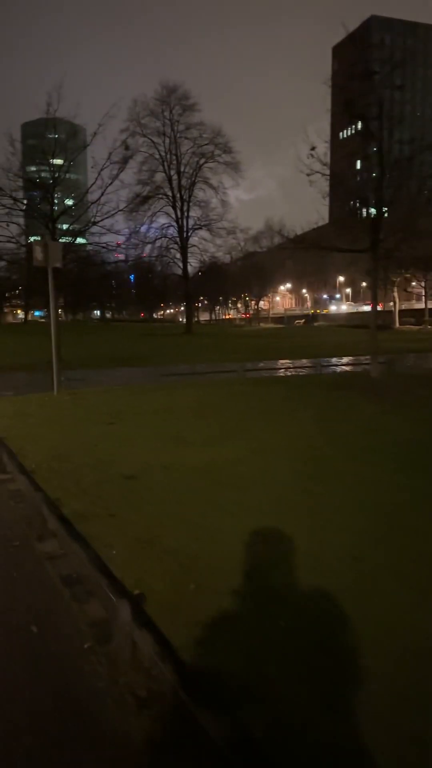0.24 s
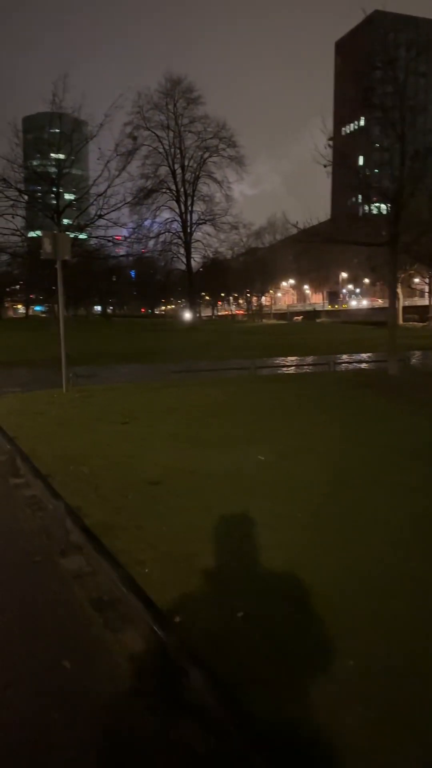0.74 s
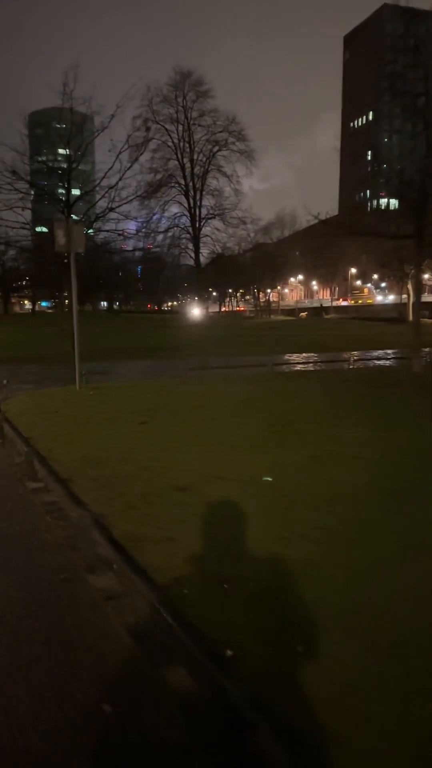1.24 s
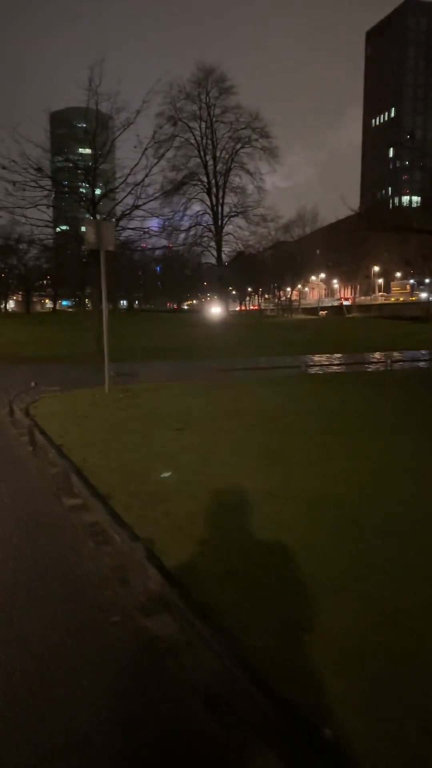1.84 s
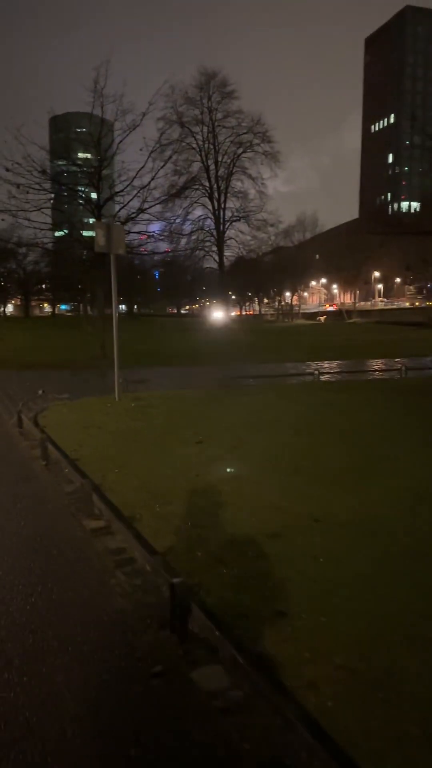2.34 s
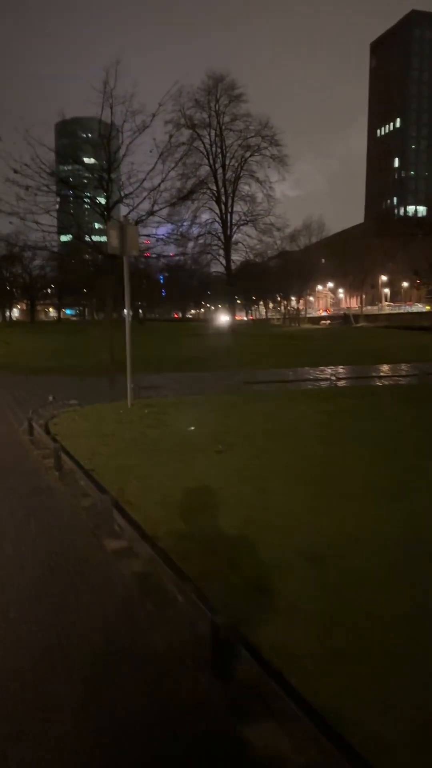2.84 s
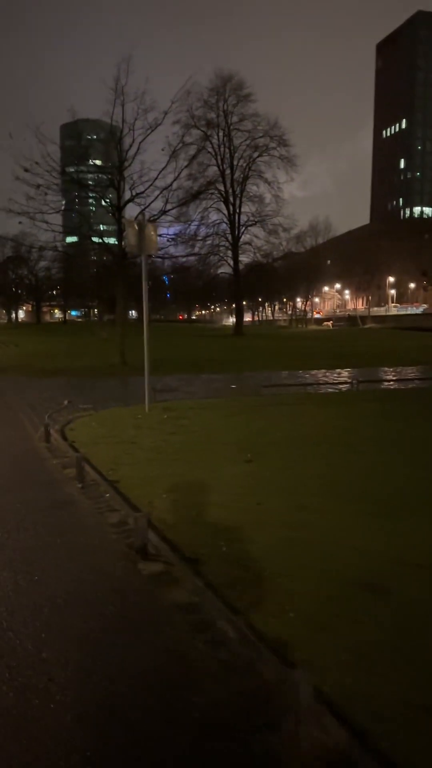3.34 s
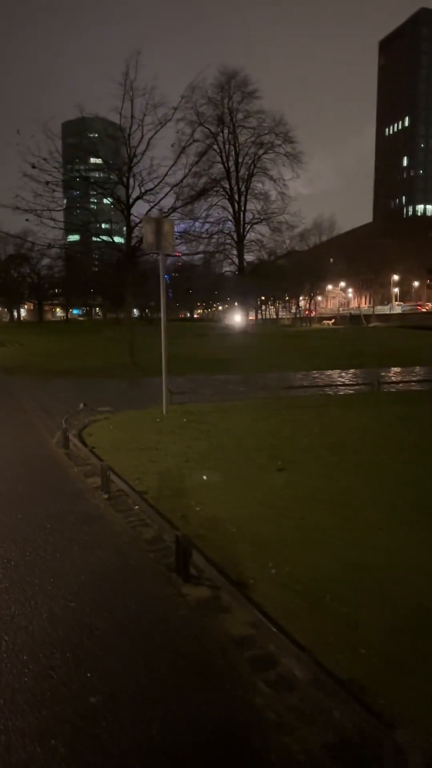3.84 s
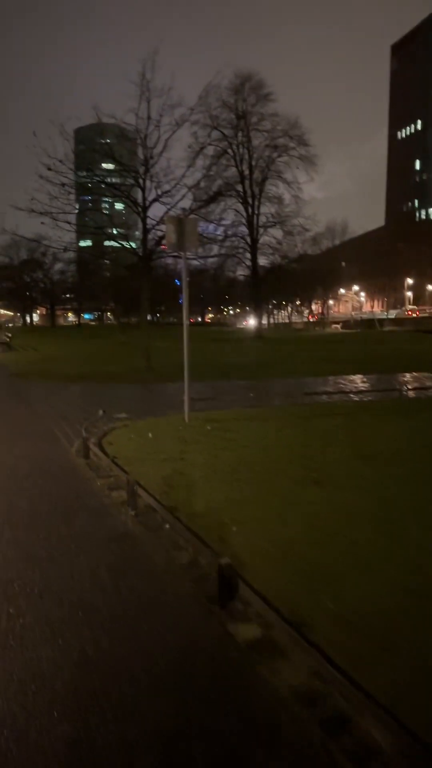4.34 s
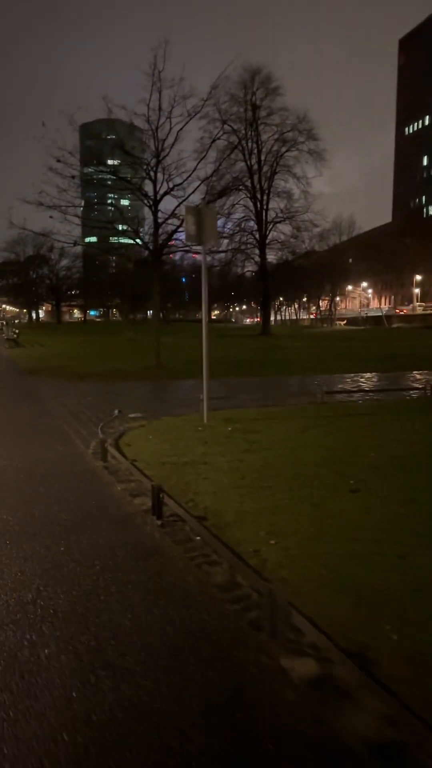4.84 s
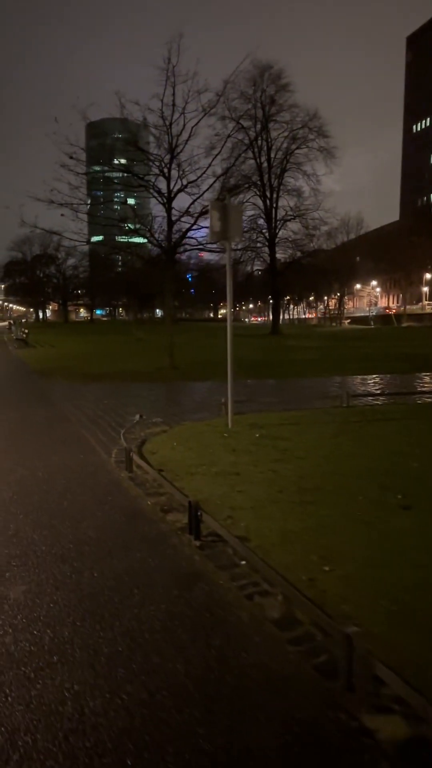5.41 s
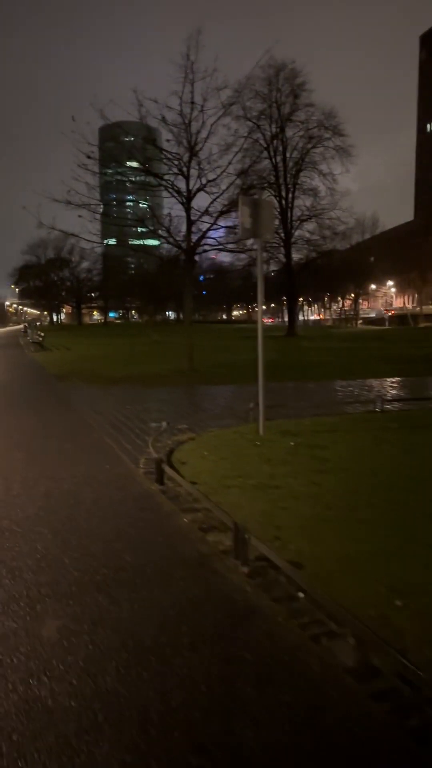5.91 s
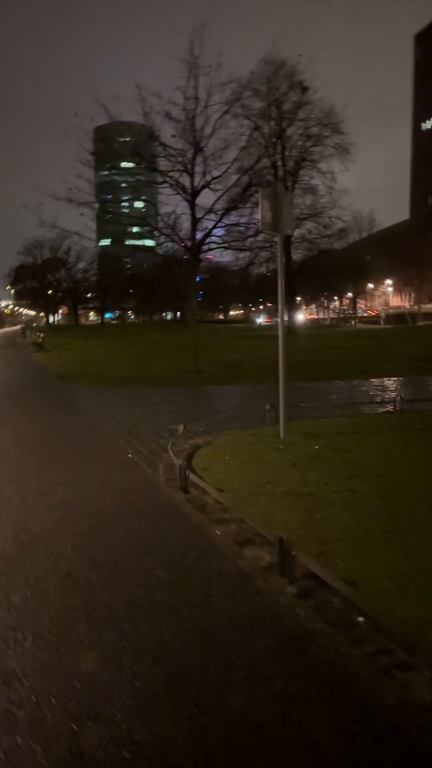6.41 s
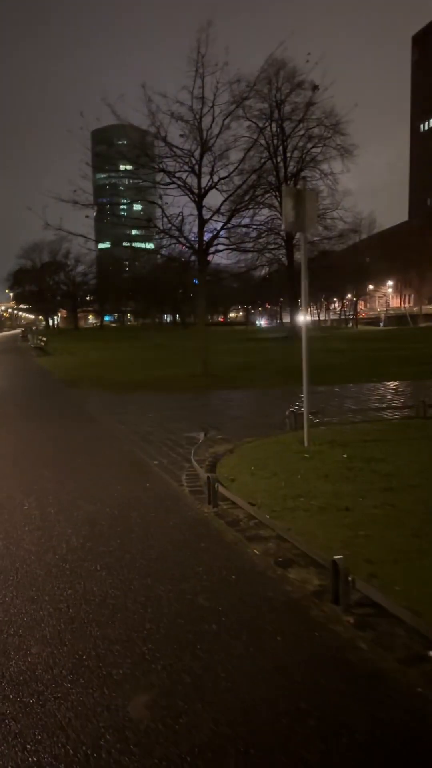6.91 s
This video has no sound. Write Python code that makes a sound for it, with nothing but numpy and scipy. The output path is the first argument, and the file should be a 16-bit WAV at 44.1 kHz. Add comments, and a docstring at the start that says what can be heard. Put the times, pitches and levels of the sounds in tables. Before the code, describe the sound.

A wide stereo outdoor scene, about seven seconds, on a wet path beside a lawn with city traffic beyond. From the start, distant engines make a low, wavering, throbbing drone with a fainter boom an octave above and deep rumble swelling at about 0.5, 0.9 and 2 seconds. Close footsteps fall roughly twice a second, each a short scuff with sharp tiny cracks and ticks of grit; the crispest come near 1.6 and 2.1 seconds. They soften after 3 and nearly vanish after 4, with only stray faint ticks around 5 and 5.6. The drone sinks near 3.5, then pulls again at a slightly lower pitch; a soft wash and brief faint whine of a passing vehicle peak around 3.6 to 4.2. Steady tyre rush, mostly left, with thin wet hiss continues; the watery swish thins late. Rumble returns around 6.5.

```python
"""A wet park path at night, walked beside a lawn with city traffic beyond it.
Close by, soles scuff and crack grit about twice a second, fading after four seconds: grains snap, ring and knock.
Far engines drone as beating clusters of tones, boom and rumble, ease off around 3.5 s and pull again.
Tyres rush on the wet road, more to the left, as shaped noise with hiss and swish; one vehicle whines past."""
import sys
import numpy as np
from scipy import signal
from scipy.fft import rfft, irfft
from scipy.io import wavfile
from scipy.ndimage import uniform_filter1d

SR = 44100
rng = np.random.default_rng(int(sys.argv[2]) if len(sys.argv) > 2 else 0)


def dump_mix(stems):
    """Bounce the given channels to the path in sys.argv[1] as a 16-bit WAV at rate SR."""
    frames = np.atleast_2d(stems).T  # one column per channel
    limited = np.clip(frames, -1, 1)  # hard clip at full scale
    pcm = np.round(limited * 32767).astype(np.int16)
    wavfile.write(sys.argv[1], SR, pcm)


N = 315832
TIME = np.arange(N) / SR
FREQS = np.maximum(np.fft.rfftfreq(N, 1 / SR), 1)

# Levels are in dB; some of the functions add a gain of their own.

# larger grains cracking under a sole: start_s, ring_hz, ring_db, snap_db, knock_hz, knock_db
GRAIN_CRACKS = [(.1612, 6240, -43, -28, 2500, -53), (0.169, 5420, -38, -21, 3100, -28.5),
                (.3618, 8060, -29, -23, 2600, -34), (0.3772, 6030, -43, -26, 1700, -45),
                (.3867, 6290, -46, -27, 2800, -50), (0.571, 7900, -43, -27, 2100, -54.5),
                (0.7546, 6640, -43, -32, 1800, -46), (.7918, 6900, -48, -34, 1700, -42),
                (0.8047, 4800, -26, -30, 3300, -31.5), (.8285, 3970, -34, -19, 2780, -24),
                (1.2067, 8400, -44, -27, 1800, -49), (1.2108, 8780, -41, -32, 1800, -55),
                (1.2624, 6130, -36, -25, 2700, -30), (1.3036, 7100, -44, -24, 2450, -39),
                (1.3176, 6160, -44, -28, 1750, -45), (1.6336, 5300, -22, -7, 2000, -25),
                (1.6449, 7060, -30, -22, 2000, -45), (1.649, 6290, -30, -19, 1900, -29),
                (1.652, 5990, -33, -15, 2450, -33), (1.6593, 9600, -33, -16, 2840, -36),
                (1.6815, 6200, -42, -30, 2150, -45), (1.6918, 7260, -42, -27, 1700, -41),
                (1.6967, 6240, -37, -26, 1700, -44), (1.7011, 7200, -32, -18.5, 2670, -31),
                (2.1028, 8960, -39, -28, 1800, -47), (2.106, 8180, -30, -20, 1800, -30),
                (2.1108, 7360, -42, -18, 1900, -44), (2.1664, 9220, -31, -22, 2760, -27),
                (2.1684, 8200, -34, -25, 1900, -28), (2.1774, 8550, -27, -14, 1900, -23),
                (2.179, 5320, -30, -21, 2800, -34), (2.2884, 7500, -46, -30, 1700, -50),
                (2.5668, 7660, -43, -23, 2200, -40), (2.579, 6290, -42, -24, 1700, -44),
                (2.6223, 9220, -33, -15, 2370, -35), (2.631, 8010, -35, -18.5, 2840, -44),
                (2.763, 7620, -45, -21, 2800, -47), (2.9359, 8550, -47, -29, 2750, -52),
                (3.0357, 8530, -45, -29, 1700, -48), (3.0596, 8250, -39, -24, 2710, -40),
                (3.1016, 6030, -45, -28, 2370, -37), (3.1247, 7200, -34.5, -21, 3790, -28.5),
                (3.1353, 8310, -40, -29, 2840, -38), (3.5581, 4260, -30, -32, 2630, -35),
                (3.5765, 5860, -49, -34, 1700, -37), (3.582, 7620, -49, -26, 1850, -43),
                (3.5894, 7800, -49, -32, 2400, -47), (3.6144, 5340, -41, -27, 2580, -47),
                (4.0055, 4600, -38, -30, 1700, -46), (4.0125, 4700, -40, -31, 3500, -45),
                (5.0671, 7950, -48, -33, 1800, -50), (5.1693, 7200, -54, -32, 2400, -52),
                (5.626, 6800, -49.5, -39, 2400, -56)]
# broad spectrum of the snap of a breaking grain: frequency_hz, density_db (per Hz)
SNAP_SPECTRUM = [(900, -30), (1900, -7), (2800, -7), (4100, -8), (5300, -0.5), (7000, -0.5), (8700, .5),
                 (10000, -2.5), (12000, -22.5), (14500, -12), (17000, -19.5)]
# spectrum of the dull spray as a grain knocks: frequency_hz, density_db (per Hz)
KNOCK_SPECTRUM = [(500, -25), (1100, -4), (1750, 1.5), (2700, 4), (3700, -6), (4600, -3), (6000, -34.5)]


def grit(splinter_db=-11.0, splinter_s=0.0017, ring_t60_s=0.0054, knock_t60_s=0.0058,
         bright_db=-5.0, spray_db=8.5, spray_s=0.0012, alike=0.31):
    """Impulsive fracture: a grain snaps, rings high and splinters, and knocks on the paving with a dull spray."""
    snaps, rings, spray = np.zeros((3, 2, N))
    age = TIME[:SR // 50]
    for start_s, ring_hz, ring_db, snap_db, knock_hz, knock_db in GRAIN_CRACKS:
        splinters = from_db(splinter_db) * pair(*rng.standard_normal((2, len(age))), alike)
        burst = splinters * np.exp(-age / splinter_s)
        burst[:, 0] = 1   # the snap itself is a single impulse
        start = np.clip(int(start_s * SR), 0, N - len(age))
        span = slice(start, start + len(age))
        snaps[:, span] += from_db(snap_db + bright_db) * burst
        modes = (ring_hz, ring_db, ring_t60_s), (knock_hz, knock_db, knock_t60_s)
        for hz, level_db, t60_s in modes:
            decay = from_db(level_db - 60 * age / t60_s)
            rings[:, span] += decay * np.sin(2 * np.pi * hz * age)
        spray[:, span] += from_db(knock_db + spray_db) * splinters * np.exp(-age / spray_s)
    return colour(snaps, SNAP_SPECTRUM) + rings + colour(spray, KNOCK_SPECTRUM)


# bright part of a crunch: frequency_hz, density_db (per Hz)
BRIGHT_SPECTRUM = [(2500, -29.5), (4400, -16.5), (5200, -4.5), (7000, -0.5), (8700, 1.5), (10000, -3.5),
                   (12000, -21), (14000, -9), (15500, -12.5), (17000, -19)]
# dull part of a crunch: frequency_hz, density_db (per Hz)
DULL_SPECTRUM = [(1500, -25), (2700, -1.5), (3400, 0), (4600, -0.5), (5400, -13), (8000, -43)]


def crunch(bright, dull, soft_hz=11000):
    """Contact filtering: soft contacts excite the bright and dull colours of the grit, without its very top."""
    top_cut = signal.butter(2, soft_hz, fs=SR, output="sos")
    return signal.sosfilt(top_cut, colour(bright, BRIGHT_SPECTRUM) + colour(dull, DULL_SPECTRUM))


# footsteps, a heel touching down and then the sole rolling:
# heel_peak_s, heel_db, heel_spread_s, sole_db, sole_dull_db (added to the sole's dull part)
FOOTSTEPS = [(0.29, -63, .006, -61, 0), (0.754, -57.5, 0.0075, -67, 7), (1.214, -62, 0.012, -62.5, 2),
             (1.641, -41.5, 0.012, -56.5, -1), (2.111, -49.5, 0.0057, -58, -6),
             (2.571, -53, 0.0058, -65.5, 9), (3.034, -58, 0.0034, -63, 7), (3.492, -64, 0.0091, -65, 11.5),
             (3.942, -73, 0.0072, -69.5, 9), (5.015, -80, 0.0063, -75, -4), (7.06, -83, 0.0072, -72, 1)]
SOLE_DELAY_S, SOLE_SPREAD_S = 0.061, 0.033   # the sole peaks later, and rises and falls slowly
HEEL_DULL_DB = -3.5   # the heel's touch is bright


def scuffs(grains_per_s=5000, size_spread_db=7.5, scuff_db=9.0, alike=0.39):
    """Granular friction: heel and sole roll over many tiny grains of uneven size."""
    born = rng.random(N) < grains_per_s / SR
    sizes = from_db(size_spread_db * np.minimum(rng.exponential(1, N), 3))
    impulses = pair(*rng.choice([-1, 1], (2, N)), alike) * born * sizes
    grains = from_db(scuff_db) * rms_one(impulses)
    bright, dull = np.zeros((2, N))
    for heel_s, heel_db, heel_spread_s, sole_db, sole_dull_db in FOOTSTEPS:
        heel = from_db(heel_db) * bump(heel_s, heel_spread_s)
        sole = from_db(sole_db) * bump(heel_s + SOLE_DELAY_S, SOLE_SPREAD_S)
        bright += heel + sole
        dull += heel * from_db(HEEL_DULL_DB) + sole * from_db(sole_dull_db)
    return crunch(grains * bright, grains * dull)


# centre pitches of the far engines: time_s, drone_hz, boom_hz
ENGINE_PITCH = [(0, 114, 200.3), (1.05, 107.5, 194.2), (2, 95, 190.3), (2.6, 100, 194), (3.15, 100, 216.9),
                (3.9, 106.2, 216), (4.9, 91.5, 190.6), (5.6, 88, 190), (7.16, 91.6, 190.6)]
# the engines pull, ease off and pull again: time_s, drone_db
DRONE_LEVEL = [(0, -19), (.45, -22), (.62, -24), (1.05, -19.5), (1.6, -21), (1.72, -27), (1.82, -21.5),
               (2.03, -19), (2.2, -29.5), (2.32, -27), (2.6, -26.5), (2.8, -27.5), (3.45, -34.5),
               (4.1, -28), (4.35, -24), (5, -26), (5.5, -22.5), (5.78, -28.5), (6, -25.5), (6.8, -29),
               (7.16, -26.5)]
# moments when the drone's beating tones happen to add up: peak_s, rise_db
CHANCE_BEATS = [(.447, 9), (.715, 3), (1.015, 3), (1.559, 3), (1.796, 12), (1.98, 3), (2.305, 8.5),
                (4.391, 2.5), (4.762, 8), (4.88, 1.5), (7.1, 9.5)]
BEAT_SPREAD_S = 0.016
# exhaust boom: time_s, boom_db
BOOM_LEVEL = [(0, -38), (.5, -38), (.93, -32), (1.2, -43), (1.4, -35), (1.9, -44.5), (2.48, -42),
              (2.6, -32.5), (2.76, -46.5), (3.07, -37), (3.42, -43), (3.7, -38.5), (4.55, -42.5),
              (5.35, -34.5), (5.83, -30.5), (6.2, -36.5), (6.65, -32), (7.16, -31)]
# heavy vehicles come and go: time_s, rumble_db
RUMBLE_LEVEL = [(0, -51), (.3, -50), (.48, -30), (.65, -41), (.9, -30), (1.5, -35.5), (1.95, -27.5),
                (2.2, -35), (2.55, -34), (2.8, -33.5), (3.2, -39.5), (4.17, -50), (4.29, -34), (4.7, -45.5),
                (5.2, -44.5), (5.9, -44), (6.5, -30.5), (7.16, -34.5)]
# deep rumble: frequency_hz, density_db (per Hz)
RUMBLE_SPECTRUM = [(15, -37), (25, -27.5), (40, 12), (55, 16.5), (72, 8.5), (110, 18), (160, -6.5),
                   (300, -62.5)]


def engines(hum_db=-6.0, cluster_db=-0.5, waver_hz=2.48, waver_db=3.0, boom_hum_db=-7.5):
    """Beating: a wavering hum in a cluster drone, a boom about an octave higher, and deep rumble noise beneath."""
    drone_hz, boom_hz = in_time(ENGINE_PITCH)
    (drone_db,), (rumble_db,), (boom_db,) = in_time(DRONE_LEVEL), in_time(RUMBLE_LEVEL), in_time(BOOM_LEVEL)
    drone_db = drone_db + sum(rise_db * bump(s, BEAT_SPREAD_S) for s, rise_db in CHANCE_BEATS)

    hum_gain = from_db(hum_db + waver_db * drift(9.4))
    hum = hum_gain * sine(drone_hz + waver_hz * drift(6.1))
    cluster = from_db(cluster_db) * engine_cluster(drone_hz, width_hz=14.8, alike=0.7, even_s=0.2)
    drone = from_db(drone_db - 0.5) * (hum + cluster)

    boom_gain = from_db(boom_hum_db + waver_db * drift(9.0))
    boom_hum = boom_gain * sine(boom_hz + waver_hz * drift(5.01))
    boom_cluster = engine_cluster(boom_hz, width_hz=12.9, alike=0.05, even_s=0.27)
    boom = from_db(boom_db - 3.0) * (boom_hum + boom_cluster)

    rumble = from_db(rumble_db - 0.7) * far_noise(RUMBLE_SPECTRUM, flutter_db=-3.0)
    return drone + boom + rumble


def engine_cluster(pitch_hz, width_hz, alike, even_s):
    """Interference: many engines firing near one pitch beat against each other."""
    offset = np.abs(np.fft.fftfreq(N, 1 / SR)) / width_hz
    spread = 1 / np.sqrt(1 + offset ** 2) / (1 + (offset / 2.76) ** 6)
    partials = rng.standard_normal((2, N)) + 1j * rng.standard_normal((2, N))
    beats = np.fft.ifft(spread * partials)
    # the fast beats stay, the slow swells are evened out
    slow_power = uniform_filter1d(np.abs(beats) ** 2, max(int(even_s * SR), 1), axis=1)
    beats = beats / np.sqrt(slow_power)
    tone = np.real(beats * np.exp(2j * np.pi * np.cumsum(pitch_hz) / SR))
    return middle_one(pair(*tone, alike))


# tyres on the road: time_s, roar_db, rush_db, hiss_db
ROAD_LEVEL = [(0, -38.5, -43, -62.5), (.6, -41, -44, -63), (1.5, -44, -44, -64), (2.8, -44.5, -43, -61.5),
              (3.1, -45, -43, -65), (3.45, -45.5, -43.5, -62), (3.85, -43, -43.5, -63.5),
              (4.3, -44, -43, -63.5), (4.95, -44.5, -44.5, -65.5), (5.5, -44.5, -43.5, -66),
              (6.35, -42.5, -42.5, -67.5), (7.16, -45.5, -42.5, -66)]
# low road roar: frequency_hz, density_db (per Hz)
ROAR_SPECTRUM = [(90, -9), (150, 11), (240, 5), (300, 0), (400, -5), (520, -6.5), (750, -22), (1500, -64)]
# rush of the treads: frequency_hz, density_db (per Hz)
RUSH_SPECTRUM = [(300, -8), (520, -0.5), (750, 1.5), (1000, 2), (1300, -0.5), (1650, -4), (2250, -7.5),
                 (2750, -3.5), (3000, -8), (3400, -19), (4500, -23), (5000, -23), (7000, -85)]
# wet hiss: frequency_hz, density_db (per Hz)
HISS_SPECTRUM = [(3000, -12.5), (4500, -6), (4950, 3.5), (5350, 7.5), (6300, -1.5), (6900, 0), (8000, -5.5),
                 (9700, -7), (11000, -35), (16000, -41)]


def tyres():
    """Broadband rolling noise: road roar, the rush of treads and the thin hiss of spray."""
    roar_db, rush_db, hiss_db = in_time(ROAD_LEVEL)
    roar = from_db(roar_db + 5.0) * far_noise(ROAR_SPECTRUM, flutter_db=1.5)
    rush = from_db(rush_db + 0.5) * far_noise(RUSH_SPECTRUM, flutter_db=0.64)
    hiss = from_db(hiss_db - 2.5) * far_noise(HISS_SPECTRUM, flutter_db=1.0)
    return roar + rush + hiss


# swish of water: time_s, level_db
SWISH_CURVE = [(0, -62), (1, -65), (2.5, -63), (3.9, -63), (5, -66), (6, -70), (7.16, -70)]
# swish of water: frequency_hz, density_db (per Hz)
SWISH_SPECTRUM = [(1500, -44.5), (2800, -8), (3300, 1.5), (4200, -5), (4800, -6.5), (6000, -35.5),
                  (9000, -70.5)]


def swish():
    """Band-shaped noise: the swish of water under the tyres thins out after four seconds."""
    level_db, = in_time(SWISH_CURVE)
    return from_db(level_db) * far_noise(SWISH_SPECTRUM, flutter_db=1.0)


# low wash of a passing vehicle: frequency_hz, density_db (per Hz)
WASH_SPECTRUM = [(200, -30), (290, -2), (370, -0.5), (460, -3), (600, -23.5), (900, -60.5)]
WHINE_S, WHINE_SPREAD_S, WHINE_HZ, WHINE_DB = 4.15, 0.2, 440, -49   # peak, spread, centre pitch, level


def passing_vehicle(waver_hz=4.0, wash_db=-50.5, wash_s=3.6, wash_spread_s=1.0):
    """Amplitude envelopes of a pass: a low wash swells and fades slowly, a wavering whine briefly."""
    wash = from_db(wash_db) * bump(wash_s, wash_spread_s) * far_noise(WASH_SPECTRUM, flutter_db=1.0)
    whine = from_db(WHINE_DB) * bump(WHINE_S, WHINE_SPREAD_S) * sine(WHINE_HZ + waver_hz * drift(6.0))
    return wash + whine


# likeness of the traffic noise at the two ears: frequency_hz, likeness (0 to 1)
EAR_LIKENESS = [(50, .8), (100, .65), (190, .25), (300, .25), (430, .6), (600, .55), (850, .85),
                (1050, .75), (2000, .95), (2800, .85), (3100, .7), (3400, .35), (4050, .7), (4500, .35),
                (5000, .65), (5250, .2), (5900, .8), (6500, .93), (9500, .65), (12000, .85)]
# left minus right level of the traffic noise: frequency_hz, difference_db
EAR_BALANCE = [(200, 2), (350, -2), (580, 4.5), (800, 4.5), (1080, 8), (1400, 7), (1850, 1.5), (2300, 4.5),
               (2750, -1), (3300, -6.5), (4200, 0.6), (9000, 0)]


def far_noise(spectrum, flutter_db):
    """Partial coherence: noise from the road reaches two ears, fluttering as the air moves."""
    ears = pair(*rfft(rng.standard_normal((2, N))), at_hz(EAR_LIKENESS))
    ears = ears * from_db(at_hz(spectrum) + at_hz(EAR_BALANCE) * [[.5], [-.5]])
    return middle_one(irfft(ears, N)) * from_db(flutter_db * drift(7.9))


# phase by which the left ear leads, for all sounds: frequency_hz, lead_rad
EAR_LEAD = [(200, 0), (350, .6), (500, 1.4), (680, .6), (870, .9), (1030, .8), (1300, -.1), (2000, -.1),
            (2400, -.9), (3100, -1.1), (3350, -1.6), (3700, .6), (4050, .4), (4400, 1), (4850, 3),
            (5100, 2.8), (5350, -.1), (7400, -.1), (8400, -1.1), (9500, -1.6), (12500, -2.3)]
# bass central at first and opening out, low roar hollow at first: time_s, central_below_hz, hollow_depth_db
IMAGE_CURVE = [(0, 440, 9), (.45, 400, 7), (.85, 350, 13), (1.3, 270, 5), (1.55, 250, -0.5), (3.3, 132, -1),
               (4.3, 45, 1.5), (5.2, 45.3, -1), (7.16, 44.7, 1)]


def stereo_image(x, hollow_hz=465, hollow_octaves=0.32, side_rise=0.6):
    """Interaural phase and mid-side balance: bass narrows to the centre, the hollow band spreads to the sides."""
    left, right = irfft(rfft(x) * np.exp(1j * at_hz(EAR_LEAD) * [[.5], [-.5]]), N)
    hz, frame_s, (mid, side) = signal.stft([left + right, left - right], SR, nperseg=2048)
    hz = np.maximum(hz, 1)[:, None]
    central_hz, depth_db = (np.interp(frame_s, TIME, column) for column in in_time(IMAGE_CURVE))
    # a negative depth fills the band in the middle instead
    hollow_db = depth_db * np.exp(-(np.log2(hz / hollow_hz) / hollow_octaves) ** 2)
    narrowing = np.sqrt(1 + (np.abs(central_hz) / hz) ** 6)
    side = side * from_db(side_rise * hollow_db) / narrowing
    mid = mid * from_db(-hollow_db)
    mid, side = signal.istft([mid, side], SR)[1][:, :N]
    return np.array([mid + side, mid - side]) / 2


def from_db(db):
    """Logarithmic level: decibels to amplitude gain."""
    return 10 ** (np.asarray(db) / 20)


def rms_one(x):
    """Power normalisation: scale to unit rms."""
    return x / np.sqrt(np.mean(np.abs(x) ** 2) + 1e-20)


def middle_one(x):
    """Mid normalisation: scale a stereo sound so that its middle has unit rms."""
    return x / np.std(x.mean(axis=0))


def in_time(rows):
    """Linear interpolation in time: each column of a curve, at every sample."""
    s, *columns = np.transpose(rows)
    return [np.interp(TIME, s, column) for column in columns]


def at_hz(points):
    """Logarithmic frequency scale: a table joined by straight lines over log frequency."""
    hz, value = np.transpose(points)
    return np.interp(np.log(FREQS), np.log(hz), value)


def drift(rate_hz):
    """Low-pass random modulation: slow chance of spread 1."""
    return rms_one(irfft(rfft(rng.standard_normal(N)) / (1 + (FREQS / rate_hz) ** 2), N))


def bump(s, spread_s):
    """Gaussian envelope: a smooth rise and fall of height 1, with a standard deviation of spread_s."""
    return np.exp(-.5 * ((TIME - s) / spread_s) ** 2)


def sine(hz):
    """Phase accumulation: a tone of unit rms that follows a pitch curve."""
    return np.sqrt(2) * np.sin(2 * np.pi * np.cumsum(hz) / SR)


def pair(mid, side, alike):
    """Coherence mixing: left and right with a given likeness, from two unrelated signals."""
    alike = np.clip(alike, -1, 1)
    return np.sqrt((1 + alike) / 2) * mid + np.sqrt((1 - alike) / 2) * side * np.array([[1], [-1]])


def colour(x, spectrum):
    """Minimum phase: a causal filter with the gains of a spectrum, made by folding its cepstrum."""
    cepstrum = irfft(np.log(from_db(at_hz(spectrum))), N)
    cepstrum[1:N // 2] *= 2
    cepstrum[N // 2 + 1:] = 0
    return irfft(rfft(x) * np.exp(rfft(cepstrum)), N)


def scene():
    """Superposition: near footsteps and far traffic add in the open air."""
    footsteps = grit() + scuffs()
    traffic = engines() + tyres() + swish() + passing_vehicle()
    return footsteps + traffic


CUTOFF_HZ = 15850


def record(dry):
    """Band limiting: the stereo image is formed, then a steep elliptic low-pass cuts the top."""
    top_cut = signal.ellip(10, .1, 80, CUTOFF_HZ, fs=SR, output="sos")
    return signal.sosfilt(top_cut, stereo_image(dry))


dry = scene()
out = record(dry)
dump_mix(out)
```